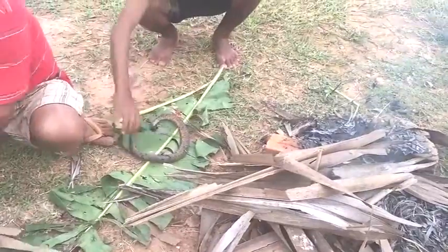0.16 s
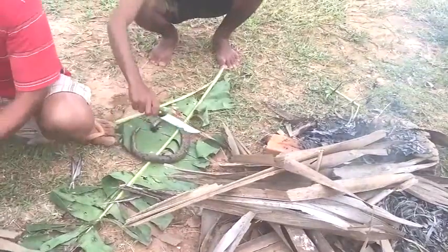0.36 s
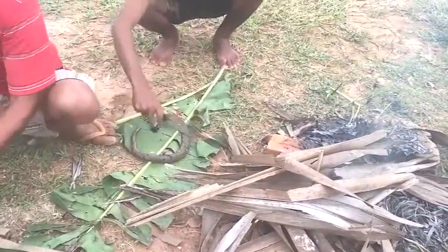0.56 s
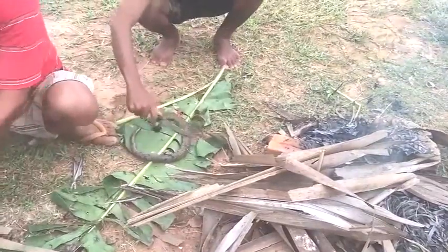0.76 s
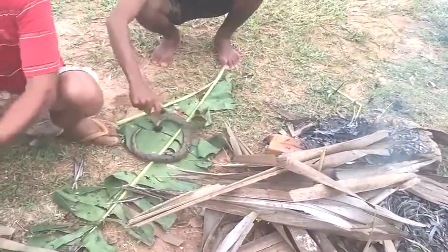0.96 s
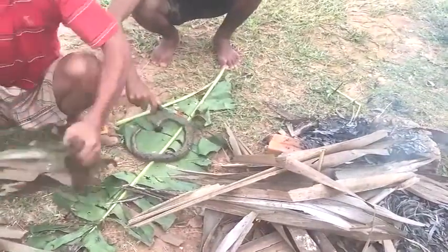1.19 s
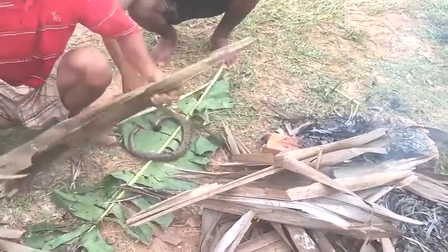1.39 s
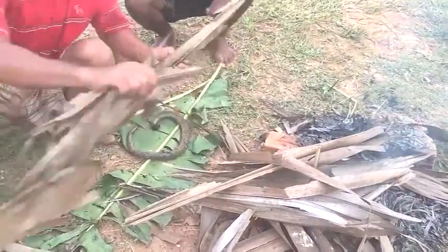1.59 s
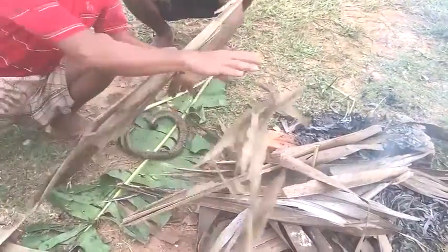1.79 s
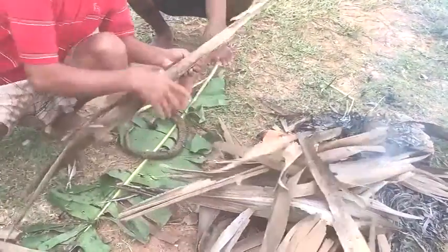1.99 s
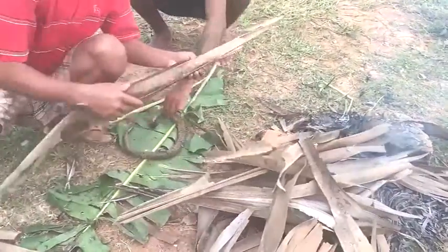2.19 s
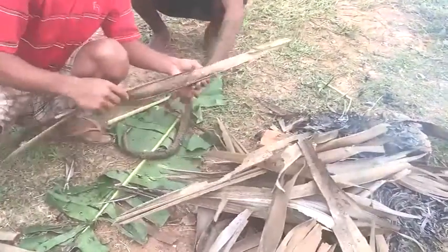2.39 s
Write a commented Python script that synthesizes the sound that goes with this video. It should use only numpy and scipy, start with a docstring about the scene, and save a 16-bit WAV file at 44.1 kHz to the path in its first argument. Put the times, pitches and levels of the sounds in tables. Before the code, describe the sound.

Dry leaf strips crackle and rustle close to the microphone outdoors: a burst of snaps early, a louder brittle tear midway, then sparser scuffs and rustles over low wind rumble, faint fire ticks and a slow flanging sweep.

```python
"""Dry rustling and crackling: long leaf strips are picked up, dragged off a pile and dropped.
Cracks are short runs of fractures ringing the strips; rustle and tear are tiny snaps ringing leaf patches.
Shaped noise makes the dull scuffs, the wind rumbling on the microphone and the outdoor air.
A small fire adds faint ticks, and a slow flanging sweep passes through everything."""
import sys
import numpy as np
from scipy import signal
from scipy.fft import rfft, irfft, next_fast_len
from scipy.io import wavfile
from scipy.ndimage import map_coordinates

SR = 44100
rng = np.random.default_rng(int(sys.argv[2]) if len(sys.argv) > 2 else 0)


def digitize_waveform(pressure):
    """Quantize a signal to 16-bit integers and store it at the path in sys.argv[1].

    Rows of a 2-D input are taken as channels; values are limited to [-1, 1].
    """
    field = np.atleast_2d(pressure).T
    bounded = np.clip(field, -1, 1)
    quanta = np.round(bounded * 32767).astype(np.int16)
    wavfile.write(sys.argv[1], SR, quanta)


N = 108045
T = np.arange(N) / SR
CUTOFF_HZ = 15650  # top of the crisp range and of the finished sound


def from_db(db):
    """Decibels to gain."""
    return 10 ** (np.asarray(db) / 20)


def rms(x):
    """Root mean square."""
    return np.sqrt(np.mean(x ** 2) + 1e-20)


def level(rows):
    """Gain envelope drawn through (t/s, level/dB) rows."""
    return from_db(np.interp(T, *np.transpose(rows)))


def coloured(x, points):
    """Minimum-phase EQ through (f/Hz, level/dB) points, so attacks get no pre-echo."""
    size = 2 * next_fast_len(len(x))
    hz, db = np.transpose(points)
    f = np.maximum(np.arange(size // 2 + 1) * SR / size, 1)
    gain = from_db(np.interp(np.log(f), np.log(hz), db))
    # Folding the cepstrum onto positive time gives the causal phase.
    cepstrum = irfft(np.log(gain))
    cepstrum[1:size // 2] *= 2
    cepstrum[size // 2 + 1:] = 0
    response = np.exp(rfft(cepstrum))
    return irfft(rfft(x, size) * response)[:len(x)]


def noise(colour):
    """Coloured Gaussian noise of rms 1."""
    sound = coloured(rng.standard_normal(N), colour)
    return sound / rms(sound)


def drift(rate):
    """Random wander of rms 1: straight lines between `rate` random points per second."""
    knots = rng.standard_normal(4000)
    slow = np.interp(T * rate, np.arange(len(knots)), knots)
    return slow / rms(slow)


def fractures(per_s, spread_db, size):
    """Random clicks of either sign, mostly small, a few large."""
    born = rng.random(size) < per_s / SR
    sign = rng.choice([-1, 1], size)
    strength = from_db(spread_db * np.minimum(rng.exponential(1, size), 5))
    return born * sign * strength


def ring(x, hz, t60):
    """One decaying resonance, with a peak gain of 1."""
    r = from_db(-60 / (t60 * SR))
    b = [(1 - r * r) / 2, 0, (r * r - 1) / 2]
    a = [1, -2 * r * np.cos(2 * np.pi * hz / SR), r * r]
    return signal.lfilter(b, a, x + 1e-18)


KNOCK_HZ, BODY_HZ, CRISP_HZ = 173, 872, 4966  # lower edges of the three ranges
KNOCK_T60_S, BODY_T60_S, CRISP_T60_S = 0.059, 0.019, 0.054
KNOCK_TAIL_DB, BODY_TAIL_DB, CRISP_TAIL_DB = -7, -9, -9  # lowered further in very short cracks
STRIP_RING_CYCLES, LONGEST_RING_S = 30, .01  # upper limits on the ring's T60
STRIP_RING_DB = -5  # against the dry force
FRACTURES_PER_S, FRACTURE_SPREAD_DB = 6000, 3.5
FIRST_BREAK_DB, RUN_FADE_DB = 11, 2.5  # the first break stands out; a run weakens as it goes
# Tone of a snapping strip: (f/Hz, level/dB)
CRACK_COLOUR = [(200, -12), (400, -17.5), (800, 2), (1150, 2.5), (1700, 6.5), (2600, 3), (4000, 6.5),
                (4900, 1.5), (5800, 4), (7000, -1.5), (8500, -4.5), (12000, -9), (15500, -10)]


def crack(length_s, levels_db, size=4096):
    """A run of fractures and its dying scatter, rung through the strip in three ranges."""
    t = np.arange(size) / SR
    progress = np.minimum(t / length_s, 1)
    run = fractures(FRACTURES_PER_S, FRACTURE_SPREAD_DB, size) * (t < length_s)
    run = run * from_db(-RUN_FADE_DB * progress)
    run[0] = from_db(FIRST_BREAK_DB)
    run = run / rms(run[t < length_s])
    scatter = rng.standard_normal(size) * progress
    short_cut = min(length_s / 0.0017, 1) ** 2  # very short cracks scatter less

    edges = [KNOCK_HZ, BODY_HZ, CRISP_HZ, CUTOFF_HZ]
    t60s = KNOCK_T60_S, BODY_T60_S, CRISP_T60_S
    tails_db = KNOCK_TAIL_DB, BODY_TAIL_DB, CRISP_TAIL_DB
    out = 0
    for low, high, db, t60, tail_db in zip(edges, edges[1:], levels_db, t60s, tails_db):
        tail = from_db(tail_db - 60 * np.maximum(t - length_s, 0) / t60) * short_cut
        force = run + tail * scatter
        rings = 0
        for hz in low * (high / low) ** rng.random(size=8):
            ring_s = min(STRIP_RING_CYCLES / hz, LONGEST_RING_S, 3 * length_s)
            rings = rings + ring(force, hz, ring_s)
        sound = force / rms(force) + from_db(STRIP_RING_DB) * rings / rms(rings)
        sound = coloured(sound, CRACK_COLOUR)
        band = signal.butter(2, [low, high], "band", fs=SR, output="sos")
        sound = signal.sosfilt(band, sound)
        out = out + from_db(db) * sound * rms(force) / rms(sound)
    return out


CRACKS_DB = 0.89  # trim on all the cracks
# Strips cracking, levels before the trim:
# (onset t/s, length t/s, knock level/dB, body level/dB, crisp treble level/dB)
CRACKS = [(0.024, 0.0045, -58, -50, -47.5), (0.091, 0.0022, -69, -53, -49),
          (0.183, 0.0058, -65, -43, -46.5), (0.301, 0.0028, -46, -42, -58), (0.409, 0.007, -43, -38, -43),
          (0.417, 0.0058, -36.5, -29.5, -26.5), (0.4251, 0.0032, -46, -30, -24.5),
          (0.429, 0.018, -51, -36.5, -44), (0.458, 0.01, -35, -32.5, -30.5), (0.467, 0.0082, -48, -30, -29),
          (0.479, 0.008, -40, -27.5, -26), (0.52, 0.0045, -53, -42, -34), (0.545, 0.0033, -69, -49, -41),
          (0.615, 0.0039, -63, -48, -40), (0.675, 0.006, -71, -59, -44.5), (0.737, 0.001, -63, -46, -35),
          (0.854, 0.0035, -70, -51, -64), (0.8708, 0.0046, -46, -36, -43), (0.912, 0.0034, -61, -50, -47),
          (0.954, 0.003, -56, -43, -37), (0.968, 0.0079, -51.5, -34.5, -37.5),
          (0.987, 0.0036, -55, -54, -37.5), (1.093, 0.0064, -66, -51, -43),
          (1.11, 0.0085, -68, -38.5, -34.5), (1.165, 0.0034, -66, -42, -34.5),
          (1.176, 0.01, -57, -32.5, -37), (1.1844, 0.0053, -46, -26, -31), (1.192, 0.0035, -47, -29, -34),
          (1.2, 0.0047, -46, -28, -27.5), (1.225, 0.0057, -44.5, -42, -39), (1.271, 0.0027, -49, -34, -33),
          (1.2843, 0.00078, -53, -25.5, -20), (1.287, 0.00031, -57, -31, -23),
          (1.3192, 0.0045, -57, -34, -27), (1.326, 0.006, -41, -34, -27.5),
          (1.352, 0.0031, -37.5, -33.5, -24.5), (1.378, 0.0019, -61, -63, -33.5),
          (1.421, 0.0071, -48, -43, -45.5), (1.495, 0.0092, -43, -39, -45), (1.524, 0.01, -69, -45.5, -55),
          (1.593, 0.006, -62, -47.5, -45.5), (1.612, 0.0097, -75, -55, -48),
          (1.814, 0.0029, -55.5, -40, -46), (1.82, 0.0089, -54, -42, -44), (1.896, 0.0035, -62, -44.5, -46),
          (1.961, 0.0039, -54, -70, -46), (2.024, 0.0058, -44.5, -46, -41.5),
          (2.098, 0.0018, -44, -41, -55), (2.105, 0.009, -45.5, -41, -53), (2.172, 0.0038, -70, -45, -53),
          (2.21, 0.0068, -64, -43, -41), (2.326, 0.0052, -75, -47, -50.5)]


def cracks():
    """Fracture runs placed at their moments, overlapping tails adding up."""
    out = np.zeros(N + SR)
    for onset_s, length_s, *levels_db in CRACKS:
        sound = crack(max(length_s, 2 / SR), levels_db)
        start = int(onset_s * SR)
        out[start:start + len(sound)] += sound
    return from_db(CRACKS_DB) * out[:N]


PATCH_T60_S, PATCH_WANDER_DB, PATCH_CHANGES_PER_S = 0.0086, 3, 40


def crinkle(curve, colour, per_s, spread_db, clump_db, ring_db):
    """Clumps of tiny snaps, each also ringing one of many patches of leaf that come and go."""
    snaps = fractures(per_s, spread_db, N) * from_db(clump_db * drift(160))
    pitches = np.linspace(600, 15000, num=48) * rng.uniform(.96, 1.04, size=48)
    dealt = rng.integers(0, len(pitches), N)  # which patch each snap strikes
    rings = 0
    for k, hz in enumerate(pitches):
        patch = ring(snaps * (dealt == k), hz, PATCH_T60_S)
        rings = rings + patch * from_db(PATCH_WANDER_DB * drift(PATCH_CHANGES_PER_S))
    sound = snaps / rms(snaps) + from_db(ring_db) * rings / rms(rings)
    sound = coloured(sound, colour)
    return level(curve) * sound / rms(sound)


# Loudness of leaves rubbing over each other: (t/s, level/dB)
RUSTLE = [(0, -51), (.07, -46.5), (.145, -53.5), (.2, -45), (.245, -44.5), (.275, -39), (.32, -46),
          (.4, -43), (.49, -38.5), (.56, -45.5), (.66, -47), (.78, -47.5), (.86, -50), (.955, -42.5),
          (1.04, -49), (1.115, -42), (1.15, -46.5), (1.2, -39), (1.3, -47), (1.41, -44), (1.48, -55),
          (1.51, -49.5), (1.6, -53), (1.67, -59), (1.8, -55), (1.84, -49.5), (1.905, -61.5), (1.965, -47),
          (2.01, -53), (2.045, -38.5), (2.12, -43), (2.2, -48.5), (2.31, -52.5), (2.36, -61.5),
          (2.45, -55.5)]
# Tone of the rubbing: (f/Hz, level/dB)
RUSTLE_COLOUR = [(300, -17.5), (600, -12), (1000, -3), (1500, -2.5), (2200, -3), (3500, -4), (4900, -9),
                 (6000, -6), (8000, -12), (12000, -15), (15500, -17)]


def rustle():
    """Leaves rubbing over each other: dense snaps with strong patch ringing."""
    return crinkle(RUSTLE, RUSTLE_COLOUR, per_s=9000, spread_db=3.0, clump_db=1, ring_db=1)


# Loudness of a strip tearing free of the pile: (t/s, level/dB)
TEAR = [(1.168, -47), (1.18, -31.5), (1.24, -34.5), (1.295, -32.5), (1.312, -37), (1.335, -33),
        (1.375, -39), (1.395, -53), (1.43, -54.5)]
# Tone of the tear: (f/Hz, level/dB)
TEAR_COLOUR = [(400, -21), (1100, -1.5), (2500, 0), (4000, 2), (4900, -4), (6300, 4.5), (8500, -2.5),
               (12000, -3.5), (15500, -3)]


def tear():
    """A strip tears free of the pile: sparser, drier snaps, silent outside the tear."""
    sound = crinkle(TEAR, TEAR_COLOUR, per_s=5400, spread_db=4, clump_db=-0.5, ring_db=-5.5)
    return sound * (T > TEAR[0][0]) * (T < TEAR[-1][0])


# Loudness of the bundle's dull scuffing, before its flutter: (t/s, level/dB)
SCUFF = [(0, -64.5), (.08, -52), (.15, -65), (.22, -50), (.28, -49), (.39, -54), (.48, -49), (.57, -56),
         (.84, -60.5), (.89, -54.5), (1, -56), (1.15, -61), (1.19, -50), (1.34, -53), (1.46, -84),
         (1.51, -55.5), (1.6, -70), (1.95, -75), (2.01, -68), (2.035, -53.5), (2.11, -53.5), (2.16, -56.5),
         (2.45, -84)]
# Tone of the scuffing: (f/Hz, level/dB)
SCUFF_COLOUR = [(25, -42), (100, 2.5), (190, 0), (300, -0.5), (430, -4), (630, -0.5), (900, -5.5),
                (1500, -1), (4000, -45)]


def scuff():
    """Dull scuffing of the bundle: low-middle noise with a quick random flutter in level."""
    flutter = from_db(2.3 * drift(70))
    return level(SCUFF) * noise(SCUFF_COLOUR) * flutter


POPS_PER_S, POP_DB, POP_T60_S = 25, -65, 0.01


def fire():
    """Sparse, faint ticks from the embers: a click and a short noise tail, in the crack tone."""
    t = np.arange(1024) / SR
    tick = rng.standard_normal(len(t)) * from_db(-60 * t / POP_T60_S)
    tick[0] = 10
    strikes = fractures(POPS_PER_S, spread_db=3.5, size=N)
    pops = signal.fftconvolve(strikes, tick)[:N]
    pops = coloured(pops, CRACK_COLOUR)
    return from_db(POP_DB) * pops / rms(pops)


BUFFET_HZ, BUFFET_T60_S = 84.3, 0.062
BUFFET_SHARE_DB = -5.5  # against the plain rumble
# Loudness of wind on the microphone: (t/s, level/dB)
WIND = [(0.0, -56), (0.02, -53.5), (0.5, -53.5), (0.61, -61), (0.87, -51.5), (1.02, -63), (1.05, -56),
        (1.28, -55), (1.34, -54), (1.5, -58.5), (1.76, -50.5), (1.85, -58.5), (1.93, -52), (2.01, -63),
        (2.05, -52.5), (2.24, -54), (2.26, -49), (2.45, -58.5)]
# Tone of the wind: (f/Hz, level/dB)
WIND_COLOUR = [(8, -69), (24, -8), (36, -9), (52, -1), (85, 0), (120, -1.5), (160, -16), (260, -21),
               (600, -31.5), (2000, -85)]


def wind():
    """Low noise that swells with the gusts, part of it gathered round one pitch by a resonance."""
    buffet = ring(noise(WIND_COLOUR), BUFFET_HZ, BUFFET_T60_S)
    rumble = noise(WIND_COLOUR) + from_db(BUFFET_SHARE_DB) * buffet / rms(buffet)
    return level(WIND) * rumble / rms(rumble)


AIR_DB = -61
# Tone of the outdoor air: (f/Hz, level/dB)
AIR_COLOUR = [(25, -30), (100, 2), (400, -7.5), (1100, -15), (3000, -14), (7000, -13.5), (15500, -20)]


def air():
    """Outdoor air: a steady bed of coloured noise."""
    return from_db(AIR_DB) * noise(AIR_COLOUR)


def scene():
    """Leaves, fire, wind and air summed, the same in both channels."""
    leaves = cracks() + rustle() + tear() + scuff()
    mono = leaves + fire() + wind() + air()
    return np.array([mono, mono])


FLANGE_DEPTH_S, FLANGE_PERIOD_S, FLANGE_LONGEST_AT_S = .002, 3.99, 1.634
FLANGE_COPY = .6  # gain of the copy against the direct sound


def record(dry):
    """A copy with a slowly swinging delay combs the sound (flanging), then the top is cut."""
    phase = 2 * np.pi * (T - FLANGE_LONGEST_AT_S) / FLANGE_PERIOD_S
    delay_s = FLANGE_DEPTH_S / 2 * (1 + np.cos(phase))
    copy = np.array([map_coordinates(ch, [(T - delay_s) * SR], order=3) for ch in dry])
    mixed = (dry + FLANGE_COPY * copy) / np.hypot(1, FLANGE_COPY)
    top_cut = signal.ellip(12, .1, 80, CUTOFF_HZ, fs=SR, output="sos")
    return signal.sosfilt(top_cut, mixed)


dry = scene()
out = record(dry)
digitize_waveform(out)
```